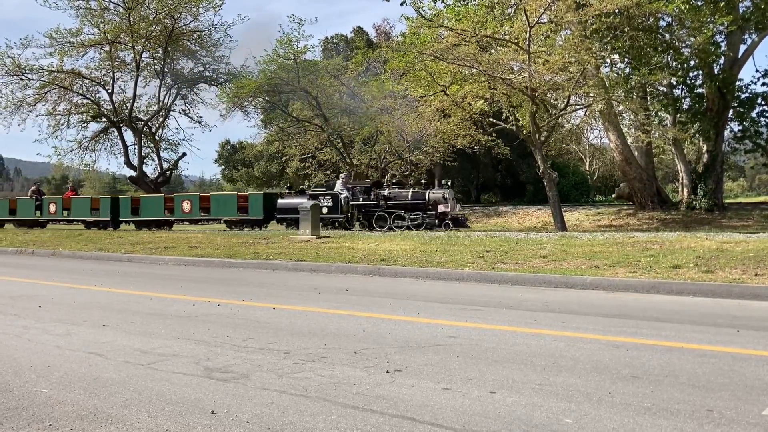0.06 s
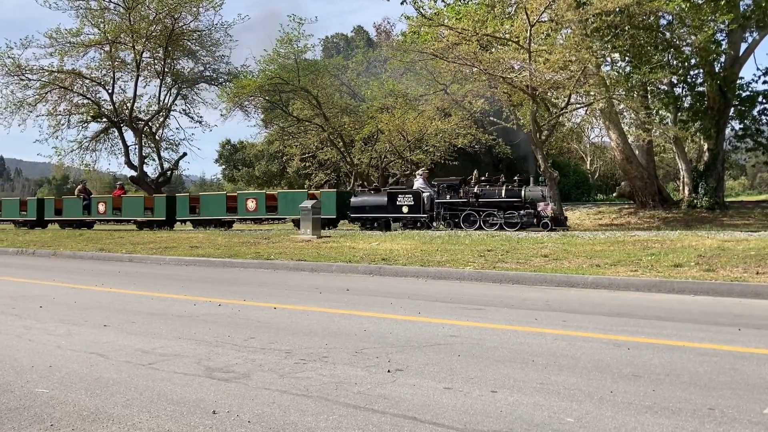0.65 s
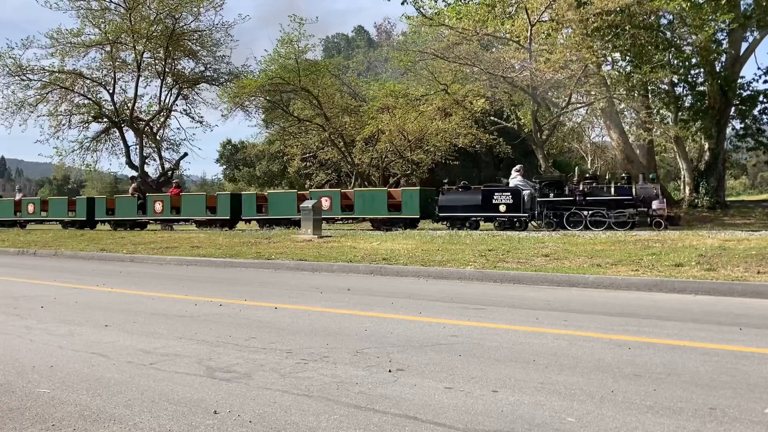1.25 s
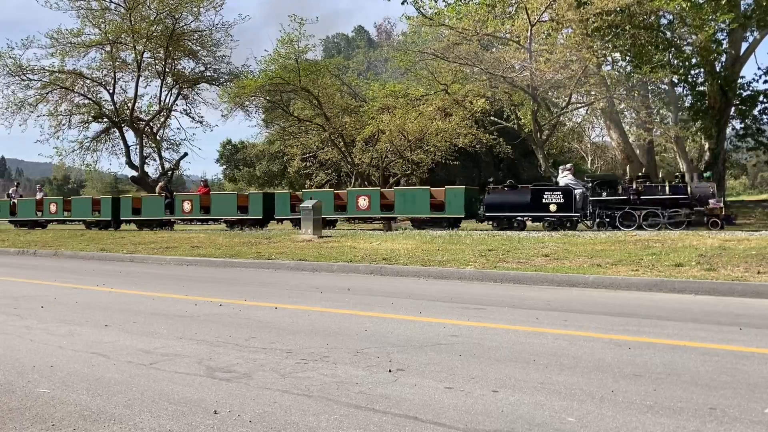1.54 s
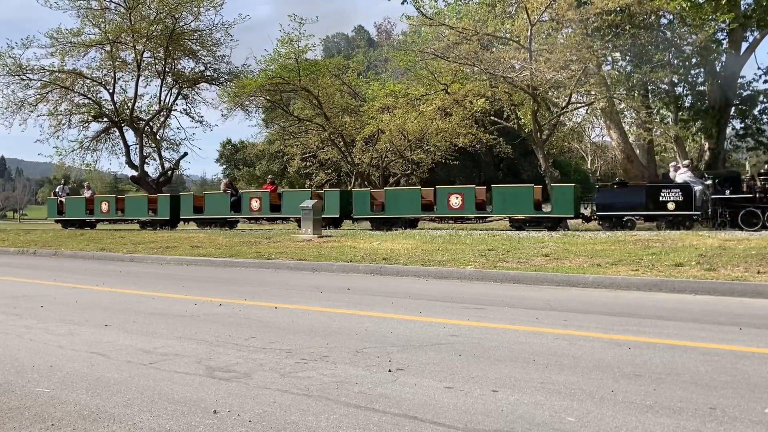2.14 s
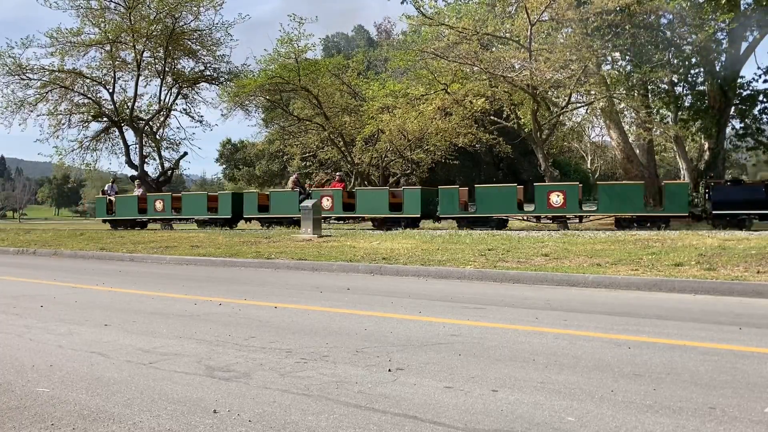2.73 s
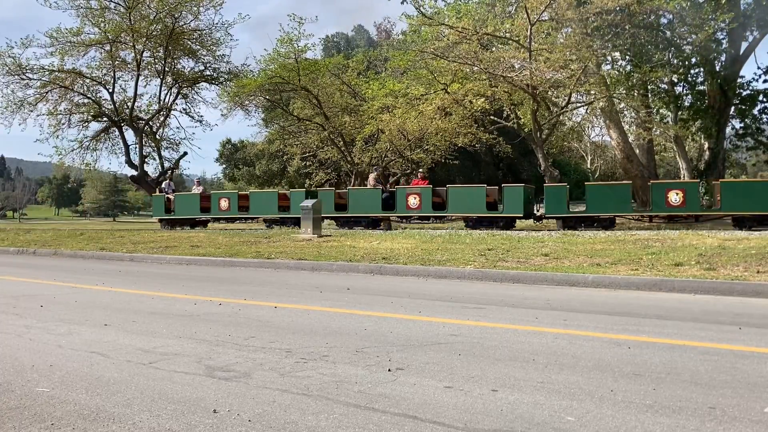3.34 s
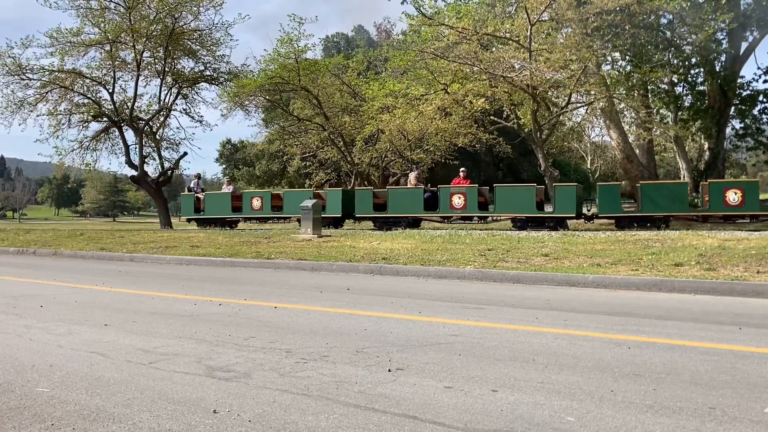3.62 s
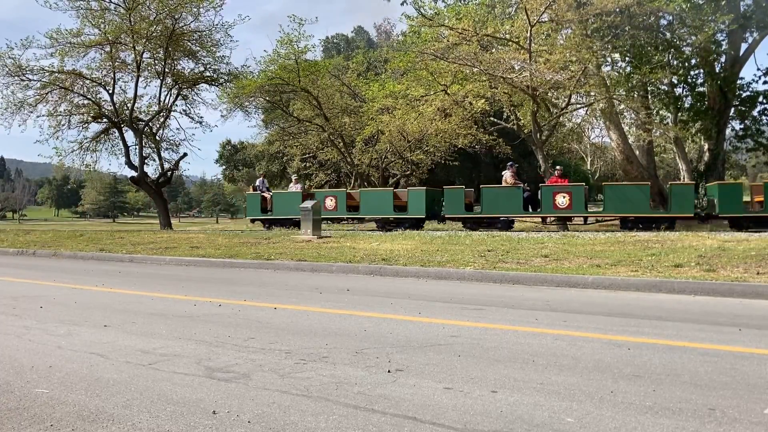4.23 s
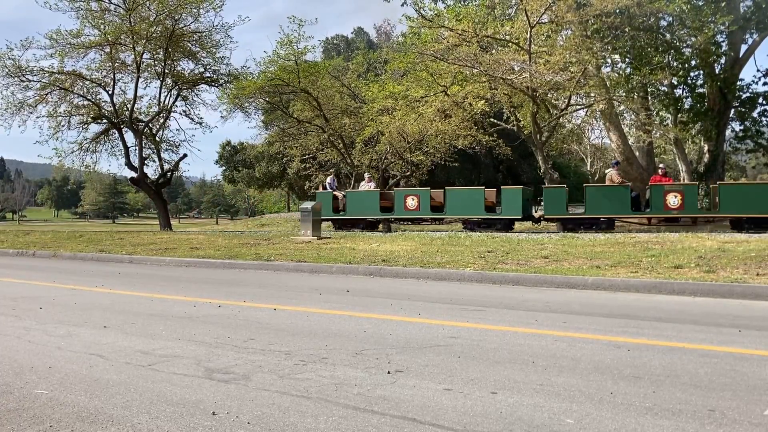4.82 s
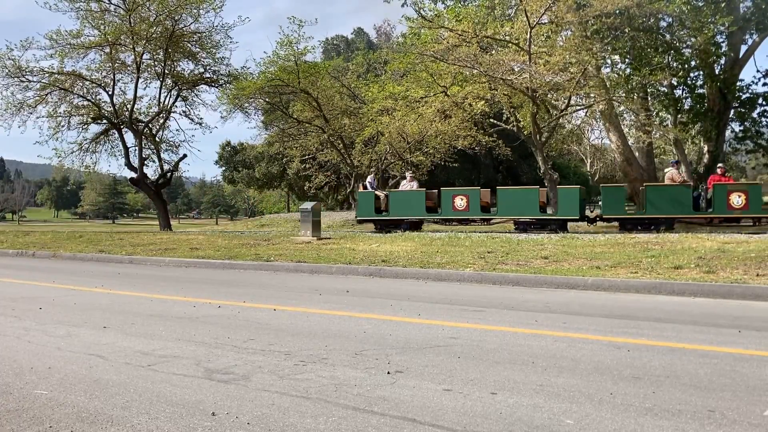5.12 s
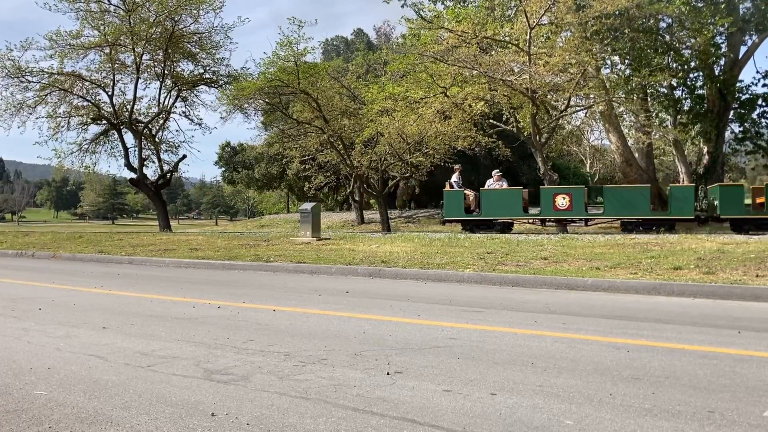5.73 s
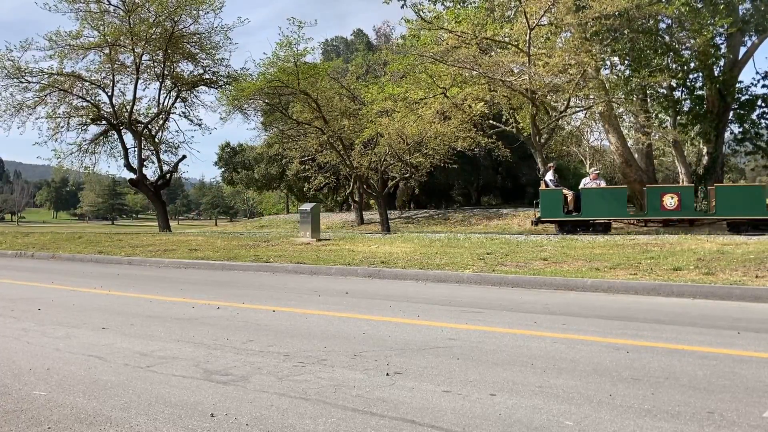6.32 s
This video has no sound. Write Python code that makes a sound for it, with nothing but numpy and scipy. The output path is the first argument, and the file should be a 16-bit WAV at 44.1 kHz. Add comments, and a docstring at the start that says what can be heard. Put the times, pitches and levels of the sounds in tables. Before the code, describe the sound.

Fast, even puffs of steam and low thumps come from a small locomotive going by outdoors, a short way from the microphone. Underneath, its cars rumble and rattle steadily, with wheels clacking in pairs and couplings chattering. The hiss is sharpest early, as the engine comes level, then grows duller and quieter. Light metal clinks come late, as the last cars roll past among the park trees.

```python
"""Deep thumps and hissing puffs, eleven a second: a miniature steam train passes and draws away.
Each slug of steam kicks the smokebox and barks from the chimney; the hardest beats boom.
The open cars rumble and rattle on rough wheels, loose links clink, and axles clack in pairs
over a rail joint. Ground and trees scatter the sound on its way to two microphone ports."""
import sys
import numpy as np
from scipy import signal
from scipy.fft import rfft, irfft, next_fast_len
from scipy.io import wavfile
from scipy.ndimage import uniform_filter1d

SR = 44100
rng = np.random.default_rng(int(sys.argv[2]) if len(sys.argv) > 2 else 0)


def generate_wav(signal):
    """Clip the signal to [-1, 1] and save it as 16-bit WAV at the path in sys.argv[1]."""
    frames = np.transpose(np.atleast_2d(signal))
    scaled = np.clip(frames, -1, 1) * 32767
    pcm = np.round(scaled).astype(np.int16)
    wavfile.write(sys.argv[1], SR, pcm)


N = 285253
TIME = np.arange(N) / SR
FREQ = np.maximum(np.fft.rfftfreq(2 * N, 1 / SR), 1)


def undb(db):
    """Decibels to gain."""
    return 10 ** (np.asarray(db) / 20)


def unit(x):
    """Scale to rms 1."""
    return x / np.sqrt(np.mean(x ** 2))


def shape(points):
    """Join rows of (f/Hz, value) on a log-frequency axis."""
    hz, value = np.transpose(points)
    return np.interp(np.log(FREQ), np.log(hz), value)


def band(hz, q):
    """The response of a resonant band, narrower as q rises."""
    return 1 / (1 + (q * (FREQ / hz - hz / FREQ)) ** 2)


def filtered(x, response):
    """Pass a sound through a frequency response."""
    size = next_fast_len(x.shape[-1] + 8192)
    gain = np.interp(np.fft.rfftfreq(size, 1 / SR), FREQ, response)
    return irfft(rfft(x, size) * gain, size)[..., :x.shape[-1]]


def noise(spectrum):
    """Two unrelated noises of one colour: the direct sound and its scattered part."""
    return unit(filtered(rng.standard_normal((2, N)), undb(shape(spectrum))))


def walk(rate):
    """A smooth random wobble that heads for a new value `rate` times a second."""
    hold = int(SR / rate)
    steps = np.repeat(rng.standard_normal(N // hold + 1), hold)
    return 0.95 * uniform_filter1d(uniform_filter1d(steps, hold), hold)[:N]


def add(out, start, sound):
    """Mix a sound in at a time in seconds."""
    i = max(int(start * SR), 0)
    out[..., i:i + sound.shape[-1]] += sound[..., :max(N - i, 0)]


def fade(t, t60):
    """Exponential decay by 60 dB in t60 seconds."""
    return np.exp(-np.log(1000) * t / t60)


def scattered(x, t60):
    """A sound paired with its short, diffuse return from ground and trees."""
    t = np.arange(SR // 4) / SR
    tail = rng.standard_normal(len(t)) * fade(t, t60)
    return np.array([x, signal.fftconvolve(x, tail / np.linalg.norm(tail))[:N]])


def turn_rate(s, top_rate=2.7956, fastest_s=1.91, easing=.00562):
    """The tempo: driving-wheel turns per second, easing off either side of the fastest moment."""
    return top_rate - easing * (s - fastest_s) ** 2


# the four-beat groove of one wheel turn: thump delay/s, thump level/dB, puff delay/s, puff level/dB
VALVE_GROOVE = [(0.0019, -1.5, 0.039, 1.5), (0.0013, -3.5, 0.041, 2), (0, -2.5, 0.046, 1.5),
                (.0045, -5.5, 0.049, 3)]
# the engine's faders as it passes and draws away: t/s, thump level/dB, hiss level/dB, bark level/dB
ENGINE_FADERS = [(0, -3.5, -33.5, -33.5), (1, 0.5, -34.5, -35), (2.2, -0.5, -36.5, -34.5),
                 (3, -3.5, -37.6, -38.5), (3.8, -4.5, -40, -40), (4.4, -9, -45, -40.5),
                 (5.1, -7, -42.5, -42.5), (5.6, -6, -47.5, -45), (6.47, -26, -51.5, -49.5)]
# accented and ghosted beats: t/s, thump trim/dB, hiss trim/dB, swoop trim/dB
BEAT_ACCENTS = [(.18, 4, -0.5, -7), (.27, 1.5, 1, -7), (.36, -5, 0.5, 6), (.45, -9, -1, -2),
                (.54, 2.5, -1, -12), (.63, 2.5, 0.5, -7), (.9, 0.5, 1, 10.5), (.99, -4, 0, 10),
                (1.08, -1.5, 1, 3), (1.17, -8, 0.5, -5), (1.26, 1, -1, -4), (1.44, -3.5, -.5, 15),
                (1.8, -8, 1, -6), (1.88, -13, 0.5, 0), (1.97, 1.5, 0.5, -2), (2.06, -7, 1.5, 15),
                (2.16, -1.5, 0, 12), (2.24, 1.5, -1, 6), (2.33, 0, 0.5, 9), (2.42, 2.5, 0.5, 5),
                (2.87, 2.5, -0.5, -3), (3.15, 0, -1, 3), (3.23, 3.5, 0, -18), (3.32, 2, -0.5, -2),
                (3.41, -1, -0.5, 0), (3.5, 8.5, 1.5, 0), (3.59, -5, 1.5, 7), (3.68, -15, 2, 0),
                (3.85, 6.5, 0.5, 2), (4.13, 5.5, 4, -9), (4.22, -18, 3, 0), (4.31, 1, 5, 0),
                (4.4, 3, 4.5, -11), (4.49, 7, 2, 6.5), (4.67, -2, 2, -7), (4.85, -5, 0.5, -4),
                (5.22, 0.5, 2, -7), (5.31, 4, -2.5, 5), (5.49, 3, 1.5, -12), (5.77, 4, 2, 1),
                (6.04, 2, 0.5, -7), (6.25, 9, 6.5, 4)]
def beats(jitter_s=.0007, thump_scatter_db=.8, puff_scatter_db=.5):
    """Four beats a wheel turn, as rows of thump t/s, thump/dB, swoop/dB, puff t/s, hiss/dB, bark/dB."""
    quarters = len(VALVE_GROOVE) * np.cumsum(turn_rate(TIME)) / SR
    starts = np.interp(np.arange(int(quarters[-1]) + 1), quarters, TIME)
    valve = np.arange(len(starts)) % len(VALVE_GROOVE)
    thump_delay, thump_db, puff_delay, puff_db = np.array(VALVE_GROOVE)[valve].T
    when, *levels = np.transpose(ENGINE_FADERS)
    thump, hiss, bark = (np.interp(starts, when, level) for level in levels)
    swoop = np.zeros(len(starts))
    for s, extra_thump, extra_hiss, extra_swoop in BEAT_ACCENTS:
        nearest = np.argmin(np.abs(starts - s))
        thump[nearest] += extra_thump
        hiss[nearest] += extra_hiss
        swoop[nearest] += extra_swoop
    late, kick, blow = rng.standard_normal((len(starts), 3)).T
    starts = starts + jitter_s * late
    thump = thump + thump_db + thump_scatter_db * kick
    puff_db = puff_db + puff_scatter_db * blow
    return np.transpose([starts + thump_delay, thump, thump + swoop,
                         starts + puff_delay, hiss + puff_db, bark + puff_db])


# the thump's body, modes of smokebox and chimney: f/Hz, width/Hz, level/dB
SMOKEBOX_MODES = [(56.1, 19.4, 49), (99.4, 23.8, 42), (139.5, 77, 35)]
# the low woof of gas leaving with each thump: f/Hz, level/dB
WOOF_EQ = [(60, -16), (95, 0), (160, -2.5), (220, -7.5), (280, -8.5), (380, -20), (600, -12.5), (1200, -39),
           (4000, -68)]
def thumps(strokes, woof_db=-19, woof_t60=.12, attack_s=.003):
    """Each ordinary slug of steam kicks the smokebox; every slug, booming or not, leaves with a woof."""
    t = np.arange(SR // 5) / SR
    gust = np.minimum(t / attack_s, 1) * fade(np.maximum(t - attack_s, 0), woof_t60)
    kicks, rush = np.zeros(N), np.zeros(N)
    booming = [np.argmin(np.abs(strokes[:, 0] - s)) for s, _ in BOOM_CUES]
    for k, (s, db, *_) in enumerate(strokes):
        if k not in booming:
            add(kicks, s, undb([db]))
        add(rush, s, undb(db + woof_db) * gust)
    # neighbouring modes swing in opposite senses
    smokebox = sum((-1) ** k * undb(db) / (1 + 1j * (FREQ ** 2 - hz ** 2) / (FREQ * width)) ** 2
                   for k, (hz, width, db) in enumerate(SMOKEBOX_MODES))
    return scattered(filtered(kicks, smokebox), t60=.042) + rush * noise(WOOF_EQ)


def swoops(strokes, from_hz=980, to_hz=93, length_s=.036, lead_s=.024, gain_db=-28, flutter_hz=520):
    """A breathy, falling rush in the chimney leads into each thump and grows with its strength."""
    t = np.arange(int(length_s * SR)) / SR
    hz = np.linspace(from_hz, to_hz, len(t))
    note = np.sin(np.pi * t / length_s) * np.exp(2j * np.pi * np.cumsum(hz) / SR)
    notes = np.zeros(N, complex)
    for s, _, db, *_ in strokes:
        add(notes, s - lead_s, undb(db + gain_db) * note)
    breathy = notes.real * walk(flutter_hz) + notes.imag * walk(flutter_hz)
    return scattered(breathy, t60=.042)


# the faders of the passing cars: t/s, rumble level/dB, rolling level/dB, clatter level/dB
CAR_FADERS = [(0, -27, -32.5, -56), (.7, -27.5, -34.5, -41.5), (1.4, -26.5, -35, -44),
              (2.2, -25, -35.5, -43.5), (3, -25.5, -34, -47), (3.7, -26, -34.5, -41.5),
              (4.4, -26.5, -37, -43.5), (5, -27.5, -36.5, -42), (5.6, -30.5, -37, -44),
              (6.47, -30, -37.5, -46)]
# the low bed of shaking car bodies: f/Hz, level/dB
RUMBLE_EQ = [(12, -42), (22, -22), (32, -4), (55, -2.5), (75, -3), (100, 0), (150, -11), (215, -8),
             (300, -14.5), (450, -22), (900, -53)]
# the midrange roar of wheel on rail: f/Hz, level/dB
ROLL_EQ = [(200, -38), (400, 0.5), (600, 1.5), (690, -1), (780, -2.5), (980, -7), (1130, -11.5),
           (1320, -13), (1600, -15.5), (1950, -9.5), (2400, -19.5), (3500, -19), (5000, -22.5),
           (15000, -42)]
def cars(rumble_db=3, rattle_db=-1, shake_db=2, rough_db=3):
    """Rough wheel treads shake the car bodies, rattle frames and couplings and make the rails roar."""
    when, *levels = np.transpose(CAR_FADERS)
    body_db, rolling_db, clatter_db = (np.interp(TIME, when, level) for level in levels)
    rumble = undb(body_db + rumble_db + shake_db * walk(24.985)) * noise(RUMBLE_EQ)
    roar = undb(rough_db * walk(50)) * noise(ROLL_EQ)
    rolling = roar + undb(rattle_db) * rattle()
    return rumble + undb(rolling_db) * rolling + undb(clatter_db) * clatter()


def jolts(per_second, scatter_db, cap):
    """Randomly timed impulses, each boosted by up to `cap` times scatter_db."""
    hits = rng.random(N) < per_second / SR
    return hits * undb(scatter_db * np.minimum(rng.exponential(size=N), cap))


# the ring of loose frames and seats: f/Hz, t60/s, level/dB
FRAME_MODES = [(420, 0.05, 1.5), (590, 0.03, -8.5), (777.4, 0.11, -0.5), (958, 0.13, -3), (1135, 0.15, -8),
               (1329, 0.081, -7), (2645, 0.029, -14.5), (3790, 0.036, -19)]
def rattle(wander=.02):
    """Small jolts ring the frames and seats, each mode on its own; pitches wander as the cars flex."""
    t = np.arange(SR // 5) / SR
    out = np.zeros(N)
    for hz, t60, db in FRAME_MODES:
        hits = jolts(per_second=45, scatter_db=4, cap=3)
        swing = np.exp(2j * np.pi * np.cumsum(hz * (1 + wander * walk(12))) / SR)
        # each hit starts a decaying sine that follows the wandering pitch
        ring = signal.fftconvolve(hits / swing, fade(t, t60))[:N] * swing
        out += undb(db) * unit(ring.imag)
    return unit(scattered(out, t60=.08))


# the bright chatter of couplings: f/Hz, level/dB
CLATTER_EQ = [(500, -22), (850, 10.5), (1300, 8), (1550, 1), (1750, 11), (1950, 2), (2300, -7.5), (2700, 6),
              (3700, -7.5), (5500, -12.5), (8000, -5.5), (14000, -32)]
def clatter(t60=.29):
    """Couplings and loose fittings chatter in quick, irregular knocks."""
    t = np.arange(SR // 8) / SR
    knocks = jolts(per_second=70, scatter_db=6.5, cap=2)
    power = signal.fftconvolve(knocks ** 2, fade(t, t60) ** 2)[:N]
    return unit(np.sqrt(np.abs(power)) * noise(CLATTER_EQ))


# metal ticks and spits of steam: t/s, level/dB, f/Hz, t60/s, Q
TICK_CUES = [(.002, -13, 864, 0.064, 6), (.139, -32, 560, 0.035, 1.6), (.522, -25, 800, .04, 1.2),
             (0.945, -23.5, 11000, 0.077, 0.8), (.96, -33, 6900, .07, 5), (1.931, -27, 912, .035, 2.3),
             (2.719, -33, 4480, 0.033, 1.6), (2.901, -33, 4500, .02, 2), (2.989, -30, 9100, 0.16, 1.7),
             (3.289, -33, 3300, .04, 2), (3.611, -35, 4200, 0.033, 2), (3.647, -24, 900, 0.038, 1.4),
             (3.791, -29.5, 3800, .02, 1.5), (4.37, -31, 2670, .04, 1.5), (4.746, -28, 900, 0.041, 1.1),
             (5.094, -38, 1300, .05, 1), (5.281, -35, 2000, .05, 0.52), (5.391, -39, 1900, 0.17, 1.8)]
def ticks():
    """Short noise bursts from couplings and steam fittings; the higher the Q, the more they clink."""
    out, t = np.zeros((2, N)), np.arange(SR // 6) / SR
    for s, db, hz, t60, q in TICK_CUES:
        burst = unit(filtered(rng.standard_normal((2, len(t))), band(hz, q)))
        add(out, s, undb(db) * fade(t, t60) * burst)
    return out


# pings of loose links and chains: t/s, level/dB, f/Hz, t60/s
CLINK_CUES = [(.002, -21, 1018, 0.16), (.355, -26.5, 1003, 0.49), (4.66, -29, 773, .15),
              (4.752, -29, 750, .13), (4.768, -35, 1460, .15), (4.825, -30, 780, 0.2),
              (4.915, -26, 780, 0.19), (4.946, -28, 1120, 0.21), (4.947, -32, 970, 0.14),
              (5.012, -30, 1265, .12), (5.1, -27, 771, .16), (5.28, -35, 1300, .15), (5.385, -29, 780, .14),
              (5.39, -27, 945, .14), (6.29, -33, 890, .15)]
def clinks(contact_s=.0027):
    """Each jolted link rings briefly on one clear, slightly unsteady note."""
    out, t = np.zeros(N), np.arange(SR // 3) / SR
    waver = 1 + .004 * walk(40)
    attack = 1 - np.exp(-t / contact_s)
    for s, db, hz, t60 in CLINK_CUES:
        phase = 2 * np.pi * np.cumsum(hz * np.interp(s + t, TIME, waver)) / SR
        add(out, s, undb(db) * attack * fade(t, t60) * np.sin(phase))
    return scattered(out, t60=.055)


# the wash between beats, growing as distance blurs them: t/s, hiss and bark shares of the mean power
STEAM_WASH = [(0, .16, .35), (4, .18, .35), (6.47, .36, .6)]
def puffs(strokes, rise_s=.027, hold_s=.014, release_t60=.15, unevenness=.15, hiss_db=-.17, bark_db=5.5):
    """The valve opens, steam hisses and barks for a moment, then dies away into the next beat."""
    t = np.arange(SR // 4) / SR
    power = np.zeros((2, N))
    for *_, s, beat_hiss_db, beat_bark_db in strokes:
        slower, longer, scatter_db = rng.standard_normal(3)
        opening = np.minimum(t / (rise_s * np.exp(unevenness * slower)), 1)
        release = fade(np.maximum(t - rise_s - hold_s, 0), release_t60 * np.exp(unevenness * longer))
        puff = np.sin(np.pi / 2 * opening) ** 2 * release
        add(power, s, (undb([[beat_hiss_db], [beat_bark_db + scatter_db]]) * puff) ** 2)
    when, *shares = np.transpose(STEAM_WASH)
    wash = uniform_filter1d(power, SR // 3) * np.array([np.interp(TIME, when, x) for x in shares])
    hiss_envelope, bark_envelope = np.sqrt(np.abs(power + wash))
    hiss = hiss_envelope * undb(hiss_db) * cylinder_hiss()
    bark = bark_envelope * undb(bark_db) * chimney_bark()
    spatter = undb(.85 * walk(260))  # wet steam leaves unevenly
    return spatter * (hiss + bark)


# the sizzle of the steam jet: f/Hz, level/dB
HISS_EQ = [(2500, -42), (4500, -3), (6200, -2.5), (7300, 2), (8300, 6), (9500, 4), (11500, 3.5), (13500, 0),
           (15500, -14)]
def cylinder_hiss(top_hz=12800, top_db=5, fall_db_per_s=3, bite_db=4.5, abreast_s=1.3, width_s=.22):
    """The hiss bites hardest when abreast; its highest treble starts bright and steadily dulls."""
    jet = noise(HISS_EQ)
    top = filtered(jet, 1 / (1 + (top_hz / FREQ) ** 16))
    jet = jet + (undb(top_db - fall_db_per_s * TIME) - 1) * top
    bite = filtered(jet, band(hz=7200, q=6.8))
    abreast = np.exp(-((TIME - abreast_s) / width_s) ** 2)
    return jet + (undb(bite_db) - 1) * abreast * bite


# the chimney's throaty bark, facing the listener and then going away: f/Hz, level/dB
BARK_AHEAD_EQ = [(200, -13), (350, -9), (480, 14), (650, 18.5), (740, 9), (880, 14), (1010, 13.5),
                 (1220, -20), (1450, -8), (2200, -2), (2700, -2), (3600, -5), (4200, -12), (8000, -25)]
BARK_AWAY_EQ = [(150, -19), (350, 8), (560, 14.5), (700, 8.5), (900, 13.5), (1150, -1.5), (1400, 5),
                (1550, -0.5), (2000, 0), (2400, -3.5), (2900, -4.5), (3400, -0.5), (3700, -2.5),
                (4200, -11), (6000, -36), (9000, -43)]
def chimney_bark():
    """Steam rushing through the chimney crossfades to a new colour as the engine comes abreast."""
    ahead = np.interp(TIME, [.9, 1.5], [1, 0])
    return np.sqrt(ahead) * noise(BARK_AHEAD_EQ) + np.sqrt(1 - ahead) * noise(BARK_AWAY_EQ)


# double hits of bogies on the rail joint: first axle t/s, first level/dB, second level/dB, ring f/Hz
BOGIE_CUES = [(.155, -14, -13.5, 508), (0.735, -14, -8.5, 502), (1.632, -12, -8, 532),
              (2.208, -10.5, -8.5, 537), (2.718, -13.5, -13, 534), (3.107, -12.5, -7.5, 547),
              (3.609, -13.5, -13.5, 486), (4.186, -38, -13.5, 483), (4.762, -25, -19, 557),
              (5.094, -14.5, -18, 552), (5.484, -37, -17, 390)]
def axles(gap_turns=.515):
    """A bogie's two axles reach the joint one spacing apart: rows of t/s, level/dB, f/Hz."""
    rows = []
    for s, first_db, second_db, hz in BOGIE_CUES:
        rows += [(s, first_db, hz), (s + gap_turns / turn_rate(s), second_db, hz)]
    return rows


# the clack's ring, modes of wheel and rail: multiple of the ring pitch, t60/s, level/dB
WHEEL_MODES = [(0.996, 0.04, -0.5), (.8, 0.033, -11.5), (1.42, 0.046, -16), (2.44, 0.014, -13),
               (3.53, 0.068, -25), (4.7, .04, -37)]
def clacks(ring_db=2.5, crunch_db=-9, dull_hz=2200, contact_s=.0012, ease_s=.005, diffuse_db=-5):
    """Each axle drops into the joint: a dull crunch and a damped ring of wheel and rail."""
    t = np.arange(SR // 5) / SR
    attack = 1 - np.exp(-t / contact_s)
    bent_time = np.cumsum(1 + .14 * np.exp(-t / ease_s)) / SR  # the pitch sags as the contact eases
    rings, blows = np.zeros(N), np.zeros(N)
    for s, db, hz in axles():
        ring = np.zeros(len(t))
        for ratio, t60, mode_db in WHEEL_MODES:
            scatter_db, detune = rng.normal(0, [.29, .0082])
            phase = 2 * np.pi * hz * ratio * (1 + detune) * bent_time
            ring += undb(mode_db + scatter_db) * fade(t, t60) * np.sin(phase)
        add(rings, s, undb(db + ring_db) * ring * attack)
        add(blows, s, undb(db + crunch_db) * fade(t, t60=.035) * attack)
    ringing = scattered(rings, t60=.05)
    crunch = filtered(blows * noise(ROLL_EQ), 1 / (1 + (FREQ / dull_hz) ** 2))
    direct, diffuse = ringing + crunch
    return direct, undb(diffuse_db) * diffuse


# the hardest beats, booming out of the chimney: t/s, level/dB
BOOM_CUES = [(.361, -6), (.9855, -7.5), (1.16, -11), (1.252, -8), (1.435, -4.2), (2.151, -8.5),
             (3.584, -5.8), (4.306, -5), (4.483, -7.5)]
def booms(from_hz=302, to_hz=42, drop_s=.01, swell_s=.015, ragged_db=1.2,
          rebound_hz=66, rebound_s=.038, rebound_width_s=.011, rebound_db=-6):
    """A hard beat drives out one steep, ragged wave that dives in pitch; the smokebox rebounds once."""
    t = np.arange(SR // 10) / SR
    hz = to_hz + (from_hz - to_hz) * np.exp(-t / drop_s)
    swell = (t / swell_s * np.exp(1 - t / swell_s)) ** 4
    after = t - rebound_s
    rebound = np.exp(-(after / rebound_width_s) ** 2) * np.sin(2 * np.pi * rebound_hz * after)
    out = np.zeros(N)
    for s, db in BOOM_CUES:
        detune = rng.normal(0, .03)
        wave = swell * np.sin(2 * np.pi * (1 + detune) * np.cumsum(hz) / SR)
        add(out, s, undb(db) * (wave + undb(rebound_db) * rebound))
    direct, diffuse = scattered(out * undb(ragged_db * walk(400)), t60=.042)
    return np.array([direct, diffuse / 2])


# stereo phase offset at angle 1: f/Hz, left lead/rad
STEREO_LEAD = [(0, 0), (230, -.2), (450, 1.2), (680, 1.5), (800, .7), (1050, 1.4), (1500, 3.1), (3000, 9.4),
               (4500, 16.3), (5400, 15.4), (6900, 12.6), (15700, 0)]
# stereo narrowness: f/Hz, likeness of the two sides (0 wide, 1 direct sound only)
STEREO_LIKENESS = [(100, 0.98), (200, 0.95), (400, 0.87), (650, 0.5), (780, 0.79), (920, 0.79),
                   (1400, 0.053), (1950, 0.58), (2400, 0.2), (2950, 0.92), (4200, 0.023), (5800, 0.68),
                   (7000, 1), (13000, 1)]
# stereo balance: f/Hz, left minus right level/dB
STEREO_BALANCE = [(60, -0.5), (200, -3), (400, -0.5), (560, 3.5), (720, 6), (900, 1.5), (1150, 5.5),
                  (2000, 2.5), (2900, 1.5), (3500, 3.5), (5000, 1), (6000, -0.5), (7000, 0)]
def ports(direct, diffuse, angle=1):
    """The direct sound reaches the two ports out of step; the scattered sound makes them unlike."""
    likeness = np.clip(shape(STEREO_LIKENESS), 0, 1)
    lead = angle * np.interp(FREQ, *np.transpose(STEREO_LEAD))
    balance = undb(shape(STEREO_BALANCE) / 2)
    balance_rms = np.sqrt((balance ** 2 + balance ** -2) / 2)
    channels = []
    for side in (1, -1):  # left, right
        port = (balance * np.exp(.5j * lead)) ** side / balance_rms
        centre = filtered(direct, port * np.sqrt((1 + likeness) / 2))
        width = filtered(diffuse, port * np.sqrt((1 - likeness) / 2))
        channels.append(centre + side * width)
    return np.array(channels)


def scene(joint_angle=.88):
    """Engine and cars, heard from across a park road; the rail joint lies more nearly straight ahead."""
    strokes = beats()
    engine = thumps(strokes) + booms() + swoops(strokes) + puffs(strokes)
    train = engine + cars() + ticks() + clinks()
    return ports(*train) + ports(*clacks(), angle=joint_angle)


def record(dry, top_hz=15800):
    """A steep low-pass shaves off the highest treble."""
    return signal.sosfilt(signal.ellip(10, .2, 80, top_hz, fs=SR, output="sos"), dry)


dry = scene()
out = record(dry)
generate_wav(out)
```